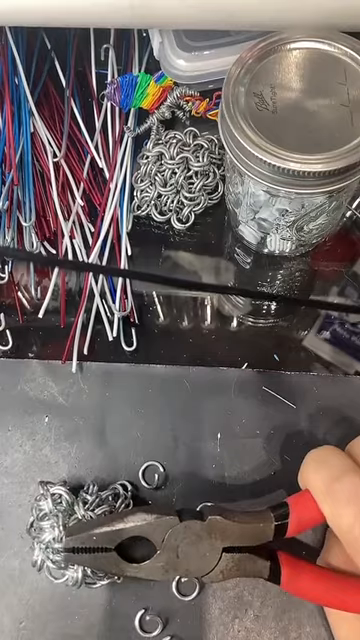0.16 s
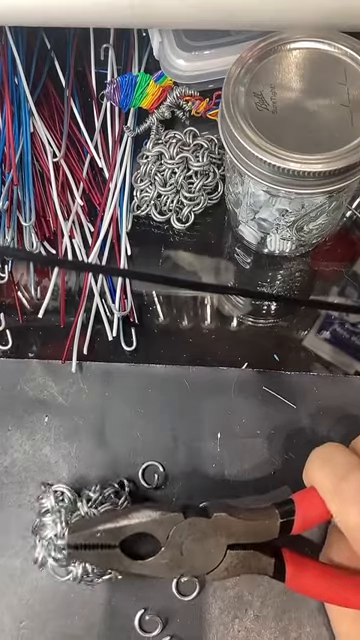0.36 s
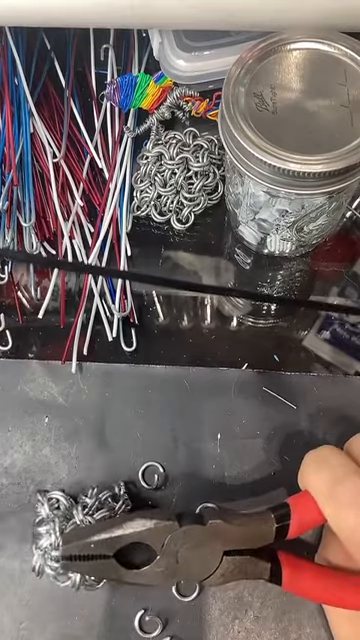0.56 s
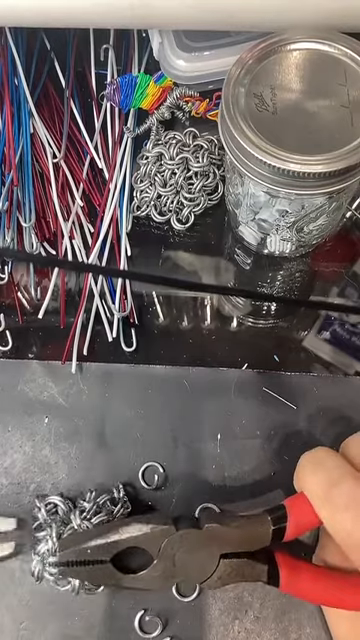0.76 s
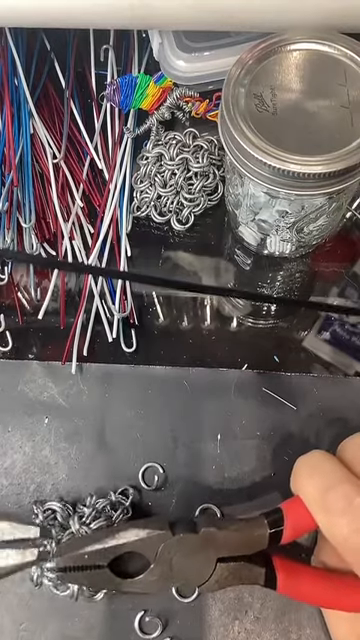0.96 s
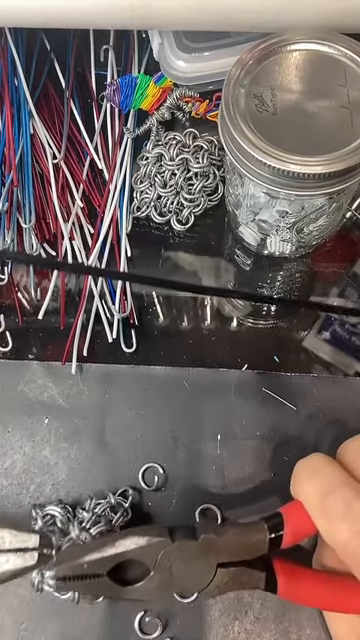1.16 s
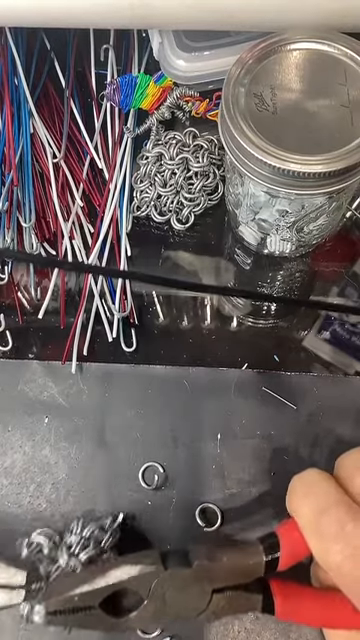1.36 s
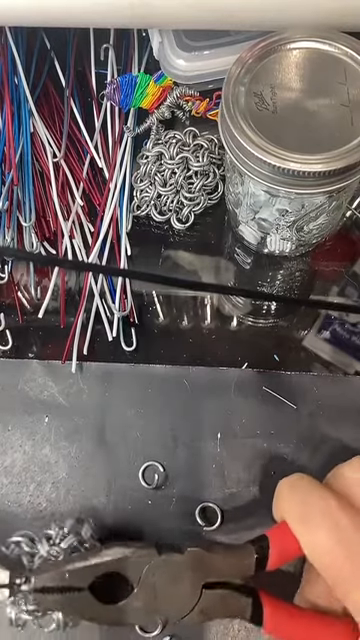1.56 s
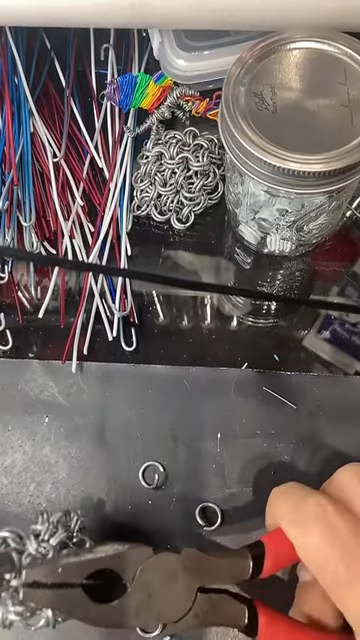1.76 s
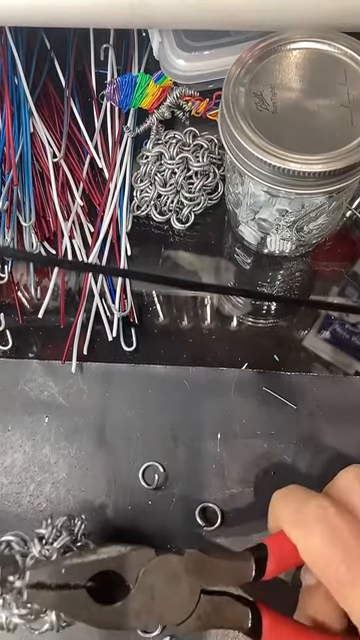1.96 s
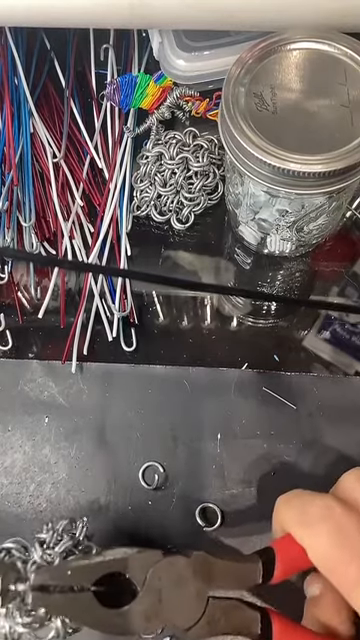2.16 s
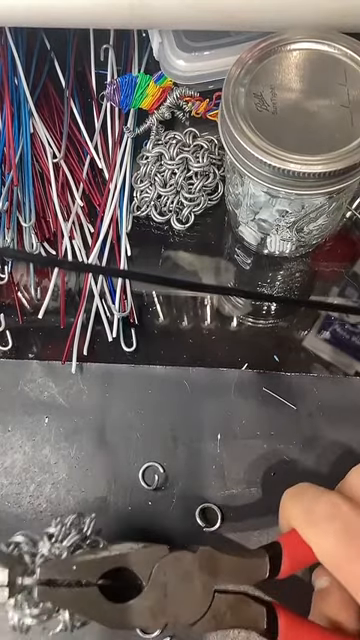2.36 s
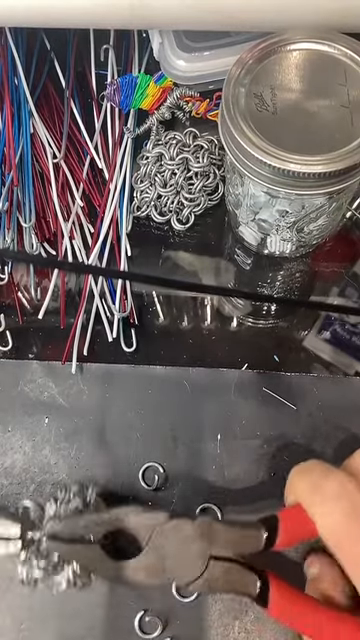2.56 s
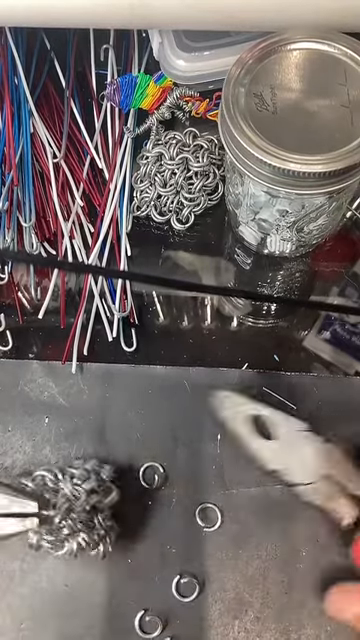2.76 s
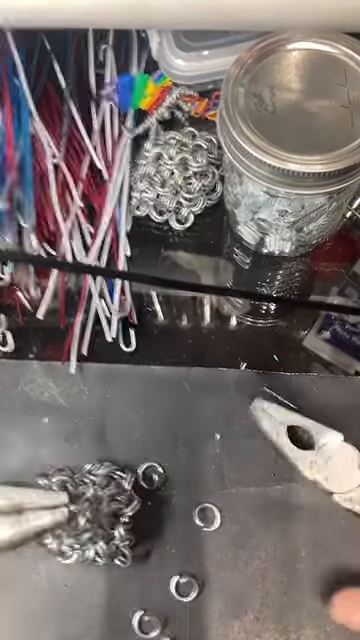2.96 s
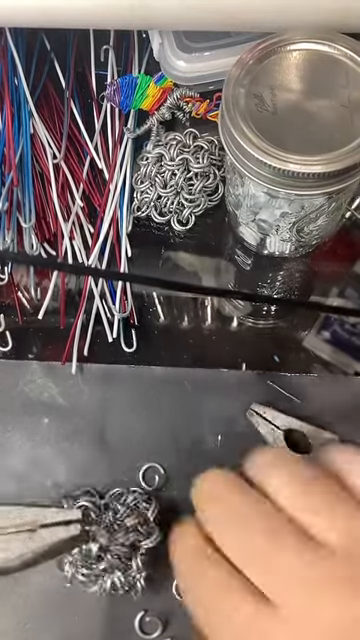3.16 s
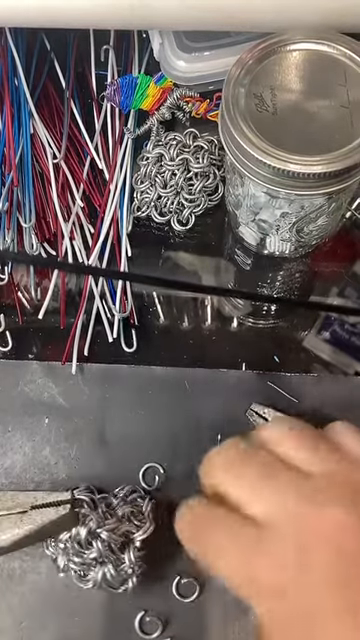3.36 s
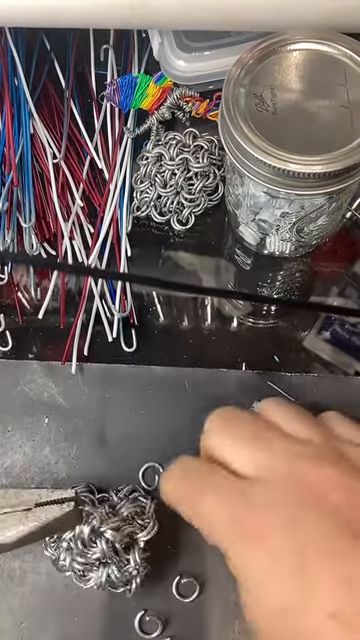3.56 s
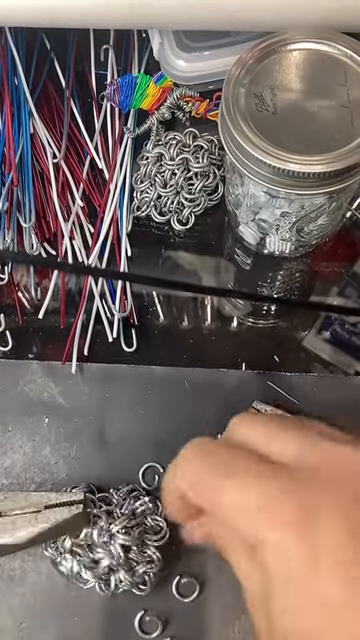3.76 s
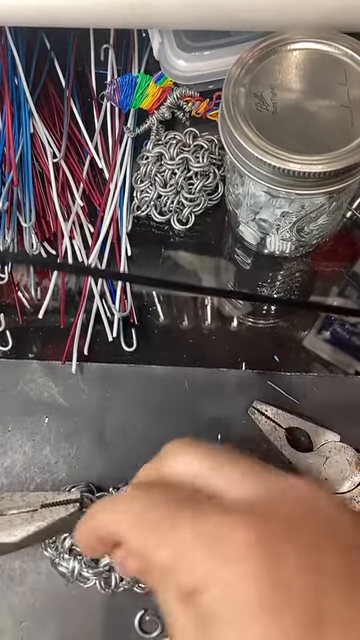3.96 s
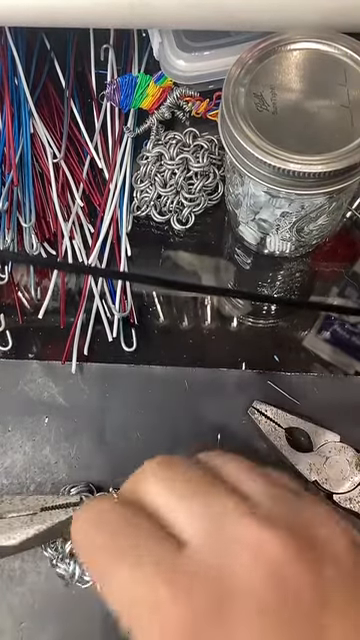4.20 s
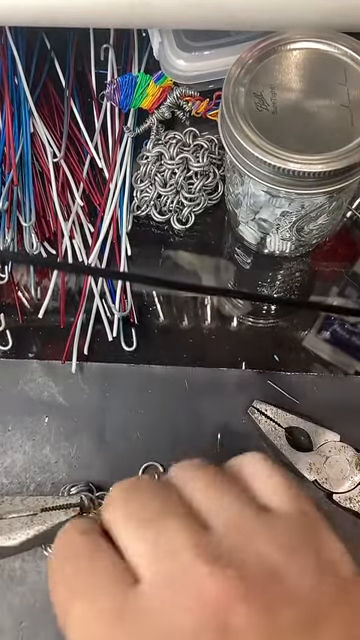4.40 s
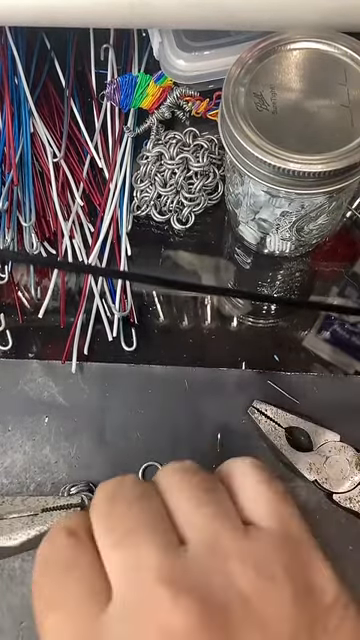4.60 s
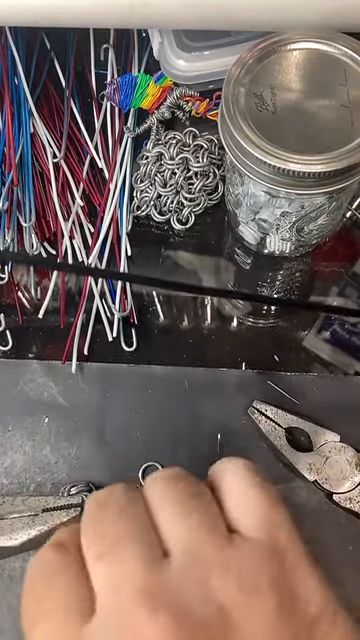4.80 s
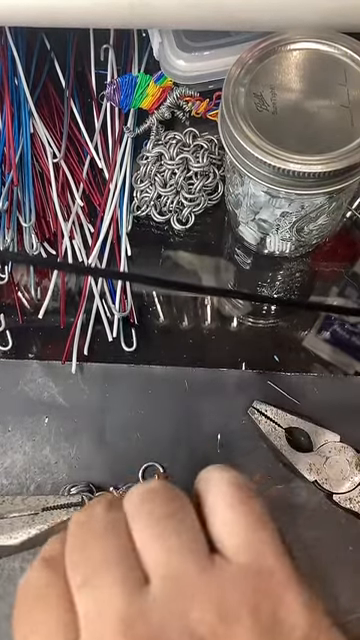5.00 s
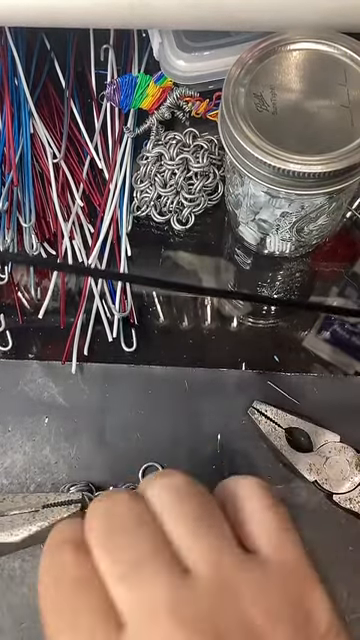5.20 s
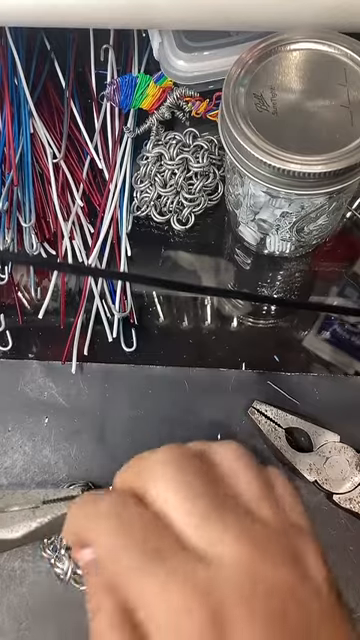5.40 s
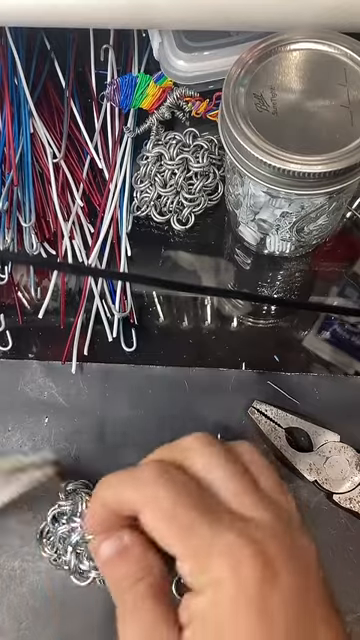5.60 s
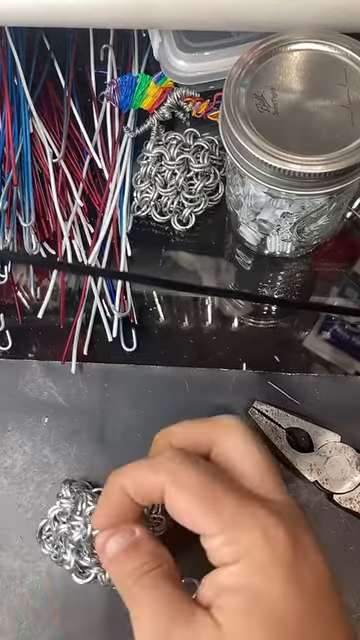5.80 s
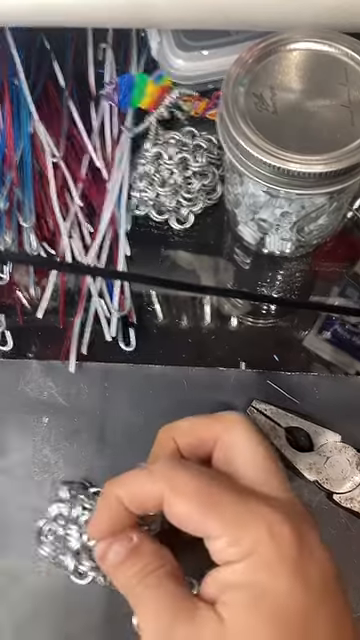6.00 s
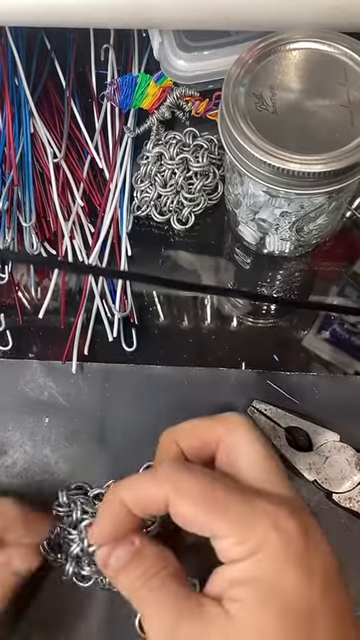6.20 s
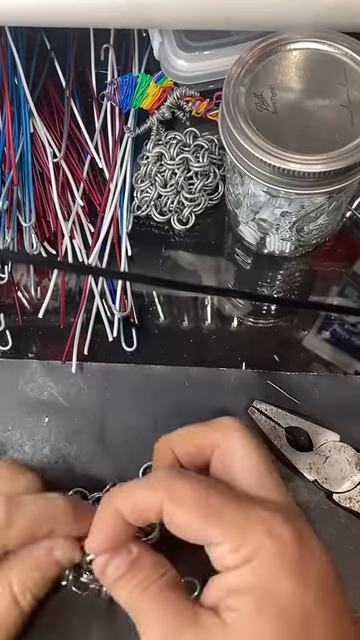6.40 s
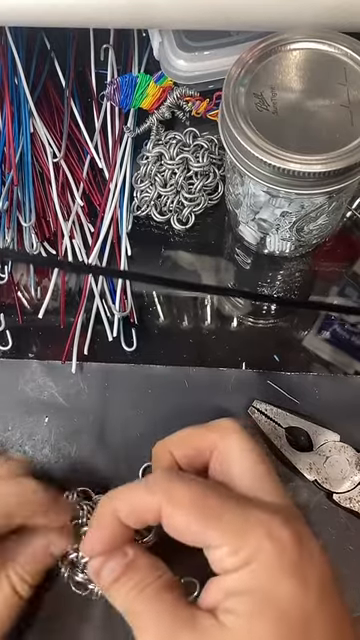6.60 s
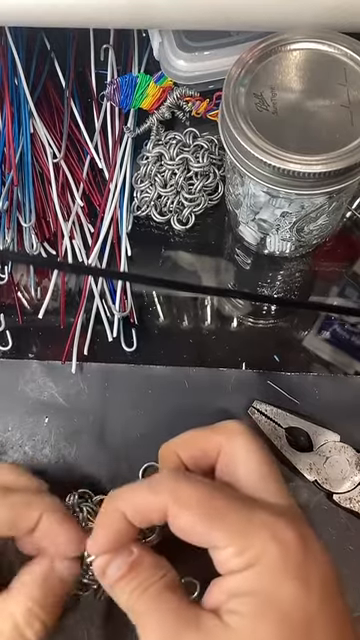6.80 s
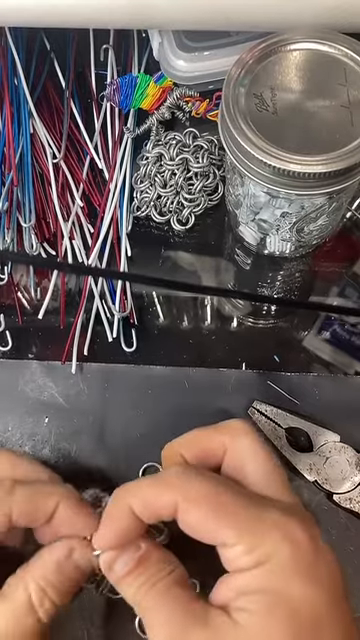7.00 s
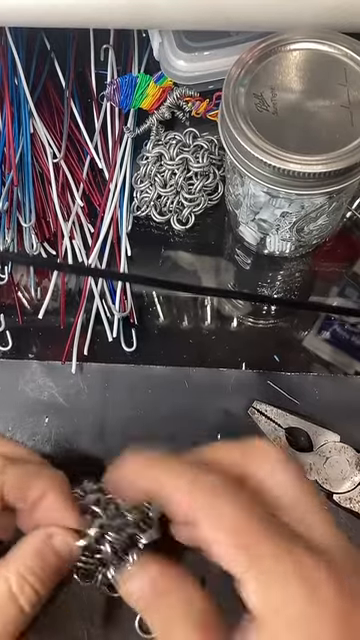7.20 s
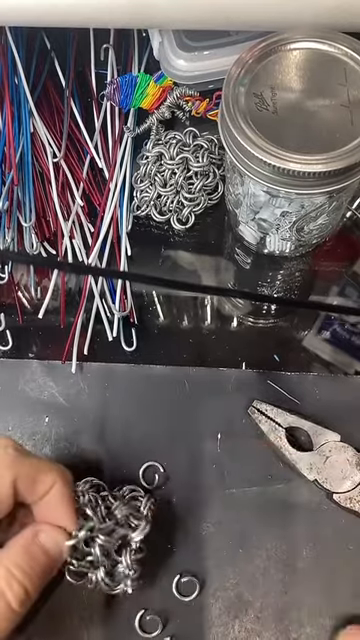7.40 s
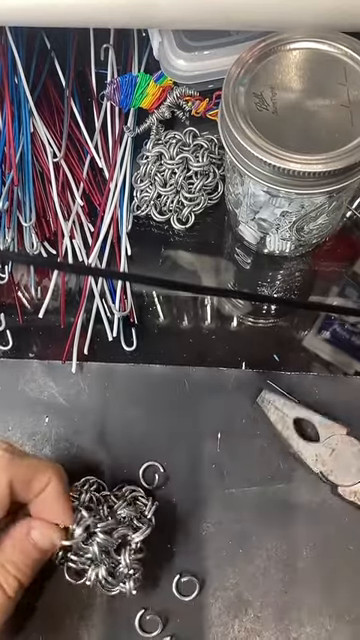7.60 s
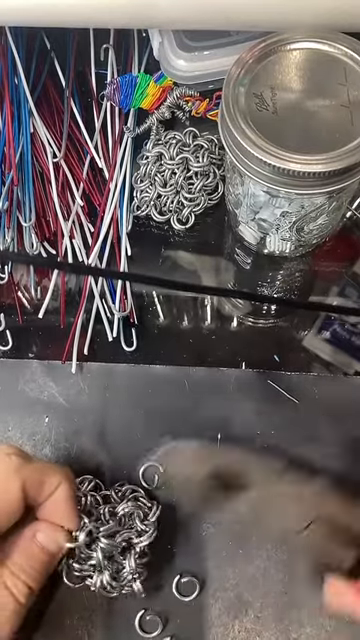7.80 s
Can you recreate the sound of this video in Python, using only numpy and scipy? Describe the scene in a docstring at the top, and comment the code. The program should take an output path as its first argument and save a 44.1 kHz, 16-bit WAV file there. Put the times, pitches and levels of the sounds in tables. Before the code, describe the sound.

Quiet, close jingling of linked metal rings, with steel pliers landing hard on the table, then two heavy thumps and more light rattling.

```python
"""Pliers and small metal rings on a table

Hands and steel pliers work a bunch of small linked metal rings on a work table in a quiet room.
The rings rustle, rattle and clink: short noises filtered to the colour of touching rings.
The pliers are put down hard: the table booms, thumps and knocks, and the steel rings on as dying sines.
A dull murmur (filtered noise), a faint mains hum (sines) and room noise lie under it all."""
import sys
import numpy as np
from scipy import signal
from scipy.fft import rfft, irfft, next_fast_len
from scipy.io import wavfile
from scipy.ndimage import uniform_filter1d

SR = 44100
rng = np.random.default_rng(int(sys.argv[2]) if len(sys.argv) > 2 else 0)


def pcm_store(signal):
    """Save signal as 16-bit PCM."""
    levels = np.round(np.clip(np.atleast_2d(signal), -1, 1) * 32767)
    wavfile.write(sys.argv[1], SR, levels.astype(np.int16).T)


N = 346178  # length in samples

# In all tables and settings, t60_s is the time to die away by 60 dB.
# Steady room noise, its colour: pitch_hz, level_db (per Hz, relative)
ROOM_COLOUR = [(12, -58.5), (20, -26), (49, -4), (90, -6), (124, -2.5), (146, -10), (305, -11), (572, -21),
               (673, -19.5), (11800, -37.5), (13500, -48.5)]
ROOM_DB = -59  # overall rms level
# Mains hum: pitch_hz, level_db (rms, before it wavers)
HUM_TONES = [(59.2, -63.5), (118.4, -62.5)]

# Colour of touching rings: pitch_hz, level_db (per Hz, relative)
RING_COLOUR = [(710, -49), (1200, -19.5), (1970, -15), (4090, -15), (5480, -13.5), (8050, -12.5),
               (10100, -21), (12400, -30), (13500, -27)]
# Sliding rings sound thinner than shaken ones: pitch_hz, level_db
SLIDING_COLOUR = [(1500, -6), (3600, -1), (4800, -2)]
# The bunch of rings is slowly dragged over the table: start_s, level_db, brightest_hz
DRAG_CURVE = [(0, -58, 6900), (.55, -61.5, 6030), (1.2, -69, 6450), (1.42, -52.5, 6400),
              (1.55, -47.5, 5930), (1.62, -49, 5520), (1.66, -52.5, 5600), (1.74, -51.5, 5443),
              (1.78, -55, 5600), (1.85, -49.5, 5404), (1.89, -66.5, 5800), (2.585, -71.5, 5630),
              (2.6, -48, 5550), (2.88, -49, 5545), (2.91, -57.5, 5566), (3.0, -52, 5713), (3.04, -56, 6000),
              (3.3, -54, 6670), (3.45, -60.5, 6700), (4.2, -69, 6300), (5.3, -70, 6724), (5.6, -61, 7000),
              (6.25, -54.5, 6520), (6.7, -63, 6790), (7.85, -56, 6084)]
# Dull, low murmur, loudest after the hard blows, probably the table dying away:
# start_s, level_db (before its lumps)
MURMUR_CURVE = [(1.25, -79), (1.45, -58), (1.9, -73.5), (2.5, -73), (2.84, -47.5), (2.91, -54), (3.07, -57),
                (3.11, -47), (3.3, -39), (3.45, -57), (4.35, -56.5), (4.6, -76), (6.1, -84.5), (6.3, -54.5),
                (7.3, -62), (7.85, -53)]
# Colour of that murmur: pitch_hz, level_db (per Hz, relative)
MURMUR_COLOUR = [(35, -6.5), (110, 15), (400, 4), (1300, -1.5), (1700, -4), (5000, -18)]
# Shakes of the bunch that swell and fade: top_s, level_db (about rms at the top), brightest_hz,
# swell_s (time of a tenfold swell)
SHAKES = [(0.023, -43.5, 7260, 0.045), (0.126, -35.5, 6600, 0.025), (.215, -40, 6800, 0.1),
          (0.262, -44, 2630, 0.062), (0.453, -40.5, 5820, 0.056), (0.996, -51.5, 6200, 0.048),
          (1.085, -58.5, 3160, 0.057), (1.426, -49.5, 2380, 0.038), (2.108, -57.5, 5640, 0.038),
          (2.805, -42.5, 5500, 0.07), (2.859, -40, 6700, 0.062), (2.99, -44, 6240, 0.072),
          (3.411, -54.5, 7100, 0.044), (3.729, -50, 8460, 0.072), (3.896, -51.5, 7680, 0.076),
          (5.67, -48.5, 7884, 0.13), (5.74, -60, 2740, 0.041), (5.98, -31.5, 6700, 0.034),
          (6.34, -42, 3100, 0.065), (6.645, -54.5, 8850, .1), (6.908, -58.5, 8530, 0.045),
          (7.064, -47.5, 7160, 0.038), (7.151, -50.5, 6570, 0.085), (7.345, -47, 3180, 0.069),
          (7.38, -36, 3300, 0.054), (7.594, -46, 6840, 0.085), (7.645, -40, 3830, 0.06),
          (7.765, -36, 6700, 0.02), (7.84, -51.5, 3520, 0.19)]

# Single clinks of ring on ring or ring on jaw: start_s, level_db (about the peak), brightest_hz
CLINKS = [(0.0943, -23, 4200), (0.1035, -17.5, 7540), (0.1162, -19, 8300), (0.184, -21, 7600),
          (0.1935, -20.5, 6800), (0.1994, -30, 6940), (0.938, -39.5, 6040), (0.9525, -37.5, 5970),
          (1.069, -38.5, 6360), (1.0964, -44, 3300), (1.2042, -40, 7860), (1.2253, -43.5, 3320),
          (1.4683, -31.5, 6400), (1.617, -36, 5400), (1.632, -47, 5500), (1.6484, -35, 5580),
          (1.6755, -34, 5400), (1.701, -40, 7700), (1.802, -40, 7700), (1.848, -39, 5430),
          (1.859, -35, 7350), (1.9148, -32.5, 5600), (2.4296, -29, 2090), (2.4448, -36.5, 2050),
          (2.5905, -25.5, 5800), (2.594, -26, 5700), (2.605, -32, 5600), (2.618, -38, 5500),
          (2.625, -45, 5600), (2.642, -25, 5100), (2.649, -34, 5500), (2.6995, -18.5, 5300),
          (2.7035, -27, 5700), (2.7084, -19, 5380), (2.7949, -32, 5600), (2.8305, -9.5, 7730),
          (2.9324, -28.5, 7900), (2.9685, -31, 5500), (2.9815, -28, 4640), (3.0915, -4.5, 8740),
          (3.099, -0.5, 2490), (3.1241, -14, 2300), (3.402, -40, 2350), (3.474, -36.5, 6900),
          (3.568, -36.5, 6500), (3.7328, -26.5, 6660), (4.1724, -46, 5800), (4.434, -47, 6500),
          (4.5263, -35.5, 7000), (4.98, -49, 7970), (5.9166, -9, 4450), (5.9652, -8.5, 6950),
          (5.973, -13, 6900), (6.127, -4.5, 8430), (6.1298, -3.5, 2680), (6.333, -29, 3300),
          (6.3441, -25, 3320), (6.5288, -35, 8700), (6.9087, -40, 8700), (7.0435, -34.5, 7240),
          (7.153, -32, 5800), (7.3884, -19.5, 4900), (7.5228, -19.5, 4400), (7.538, -43, 6350),
          (7.6179, -11.5, 4300), (7.7175, -32.5, 2050), (7.7848, -31.5, 6700)]

# Blows on the table: start_s, boom_db, thump_db, thump_hz, knock_db
BLOWS = [(0.11, -35, -33.5, 258, -39), (0.283, -36.5, -27, 247, -44.5), (1.422, -60, -45.5, 397, -41.5),
         (1.875, -52, -60, 248, -53), (2.43, -68, -69, 600, -46.5), (3.026, -42.5, -36.5, 396, -48.5),
         (3.087, -16.5, -14, 679, -1.5), (3.6, -44, -54, 300, -58), (4.09, -54, -50.5, 320, -58),
         (4.33, -48, -46.5, 384, -53), (5.914, -18.5, -7, 390, -11.5), (6.113, -32, -28, 330, -41),
         (6.127, -17.5, -9.5, 320, -18.5), (6.337, -51, -43, 600, -38), (7.388, -51, -34.5, 486, -34),
         (7.523, -69, -46, 400, -41.5), (7.643, -38.5, -37.5, 354, -40.5), (7.752, -38.5, -36.5, 263, -50),
         (7.809, -50, -43, 370, -43.5)]
# Low boom of the table top: pitch_hz, level_db (relative), t60_s (for the heaviest blow)
BOOM_MODES = [(62.7, -13.5, 0.47), (85, -6, 0.25), (110.56, -3, 0.44), (181.7, -4.5, .35),
              (224.1, -8.5, 0.31), (261, -10, 0.19), (337, -11, 0.24)]
# Colour of the dense knock: pitch_hz, level_db (per Hz, relative)
KNOCK_COLOUR = [(150, -31.5), (250, -0.5), (424, -4.5), (631, -2.5), (708, -5), (1050, -6), (4820, -21.5),
                (13000, -44)]
# How long the dense knock lasts: pitch_hz, t60_s (for the heaviest blow)
KNOCK_T60 = [(300, 0.29), (1500, 0.33), (5000, 0.38), (12000, 0.11)]
# Clearer tones in the knock: pitch_hz, level_db (relative), t60_s (for the heaviest blow)
KNOCK_MODES = [(794, 4, 0.16), (1087, -0.5, .25), (1356, -7.5, .2), (1575, 0, 0.15), (1660, 0, .22),
               (2062, -5.5, 0.18), (2287, -4.5, 0.12), (2680, -4.5, 0.16), (3150, -8, 0.18),
               (4700, -9.5, .05)]

# Pliers land on the table: start_s, ring_db (table top), rattle_db (rings), brightest_hz
PUT_DOWN = [(3.09, -23, -18, 4750), (5.918, -26, -31, 4570), (6.13, -34, -22.5, 4850)]
# Long, faint ring of the metal table top: pitch_hz, level_db (relative), t60_s
STEEL_MODES = [(258, -29, 2), (323, -22, 2.2), (366, -28, 2.5), (452, -30, 2), (748, -32, 1.8),
               (942, -29, 2.5)]
# Ring of the pliers, some modes in close beating pairs: pitch_hz, level_db (relative), t60_s
PLIERS_MODES = [(649, 3.5, .65), (1227, -30, 2.2), (1346, -31, 1.8), (1782, -32, 1.8), (2080, -35, 1.6),
                (2089, -34, 2.2), (3540, -21, .6), (3590, -22, .6), (3750, -32, 1.5), (3790, -32, 1.4)]

# Stereo width, the side signal under the middle: pitch_hz, level_db
WIDTH = [(3700, -90), (4400, -15), (8000, -15), (13000, -18)]
EDGE_HZ = 13150  # almost nothing is left above this pitch

# Rings: another takes over this often, at a slightly other pitch (spread as a share of the pitch)
RING_TURN_S, RING_SPREAD = .0035, .065
MURMUR_LUMPS_DB = 2.6  # the murmur comes in lumps of a few tens of ms
FADE_PER_SWELL = .7  # a shake stops sooner than it swells

# Clinks: the neighbouring rings settle almost at once
SETTLE_T60_S = .01
# A clink thins out below these shares of its brightest pitch, and far above it
THIN_DB, THIN_FROM, THIN_TO = -5, 0.4, 0.57
# Faint clinks under the fingers, at random
FAINT_PER_S, FAINT_DB, FAINT_SPREAD_DB = 10, -56, 2
FAINT_LOW_HZ, FAINT_HIGH_HZ = 4980, 9560

# Blows: a lighter one dies sooner, losing this share of its ring time per dB of boom under the heaviest
SHORTER_PER_DB, HEAVIEST_DB = .006, -16.5
# The bending wave brings the treble first: the thump drops at once to this share of its pitch
THUMP_FALL_S, THUMP_END, THUMP_T60_S = .005, .22, .06
BASS_LATE_S = .015  # the low modes come together this long after the blow
MODE_GAP_HZ, MODE_DB = 40, 14  # the knock holds many thin modes at chance pitches

# Landing: the jolted rings rattle out; the faint ring of the top wavers, mode by mode
RATTLE_T60_S, WAVER_DB = 0.26, 4
# The first pair of pliers lands free of the hand and rings
PLIERS_S, PLIERS_DB = 3.092, -23


def gain_of(db):
    """Turns decibels into a plain multiplier."""
    return 10 ** (np.asarray(db) / 20)


def evened(x):
    """Scales a sound to an rms level of 1."""
    return x / np.sqrt(np.mean(x ** 2) + 1e-20)


def smoothed(x, size):
    """Averages neighbours in time twice, so only slow changes stay."""
    return uniform_filter1d(uniform_filter1d(x, size), size)


def read(points, hz):
    """Reads a table of pitches and values at any pitch, on a logarithmic pitch scale."""
    f, value = np.transpose(points)
    return np.interp(np.log(hz + 1), np.log(f + 1), value)


def follow(rows, column):
    """Draws one column of a table as a curve along the whole time."""
    return np.interp(np.arange(N) / SR, *np.transpose(rows)[[0, column]])


def add(mix, s, sound):
    """Adds a sound into the mix at a time in seconds."""
    part = mix[round(s * SR):][:len(sound)]
    part += sound[:len(part)]


def coloured(x, points):
    """Filters a sound by a spectrum in dB."""
    size = next_fast_len(len(x))
    gains = gain_of(read(points, np.fft.rfftfreq(size, 1 / SR)))
    return irfft(rfft(x, size) * gains, size)[:len(x)]


def resonate(x, hz, width):
    """Shifts the curve hz down to zero, smooths, and shifts back: a resonance of gain 1."""
    turn = np.exp(2j * np.pi * np.cumsum(hz * np.ones(len(x))) / SR)
    r = np.exp(-np.pi * width / SR)
    smooth = signal.lfilter([1 - r], [1, -r], x / turn + 1e-18)
    return 2 * (turn * smooth).real


def ringing(modes, t, spread_db, length=1):
    """Adds up dying sines; where the blow lands changes the share of each mode."""
    shares = gain_of(spread_db * rng.standard_normal(len(modes)))
    total = 0
    for share, (hz, db, t60) in zip(shares, modes):
        fade = gain_of(db - 60 * t / (t60 * length))
        total = total + share * fade * np.sin(2 * np.pi * hz * t)
    return total


def contacts(size):
    """About a thousand tiny contacts a second, a few strong, each a puff of about a millisecond."""
    strength = gain_of(2.8 * np.minimum(rng.exponential(1, size), 4))
    hits = strength * (rng.random(size) < 1000 / SR)
    puffs = signal.lfilter([1], [1, -np.exp(-1 / (0.001 * SR))], hits)
    return evened((2.0 + puffs) * rng.standard_normal(size))


def jingle(x, hz, focus=1):
    """The broad colour of touching rings, one strong ring mode and a weaker one above it."""
    # no two rings ring quite alike; the first keeps the given pitch
    turns = np.arange(len(x)) // round(RING_TURN_S * SR)
    detune = RING_SPREAD * rng.standard_normal(turns[-1] + 1)[turns] * (turns > 0)
    hz = hz * (1 + detune)
    modes = evened(resonate(x, hz, 240)) + 0.42 * evened(resonate(x, 1.38 * hz, 240))
    return evened(0.98 * evened(coloured(x, RING_COLOUR)) + 0.64 * focus * modes)


def room():
    """Steady room noise with a slightly wavering mains hum."""
    t = np.arange(N) / SR
    waver_db = 2.0 * evened(smoothed(rng.standard_normal(N), 4000))
    hum = sum(np.sqrt(2) * gain_of(db + waver_db) * np.sin(2 * np.pi * hz * t) for hz, db in HUM_TONES)
    noise = evened(coloured(rng.standard_normal(N), ROOM_COLOUR))
    return hum + gain_of(ROOM_DB) * noise


def drag():
    """Rings rustle as they slide, ringing more when louder; a dull, lumpy murmur lies under them."""
    rustle_db = follow(DRAG_CURVE, 1)
    focus = 1.9 * np.clip((rustle_db + 65.0) / 16, 0, 1)
    rings = coloured(jingle(contacts(N), follow(DRAG_CURVE, 2), focus), SLIDING_COLOUR)
    lumps = evened(smoothed(rng.standard_normal(N), 1500))
    murmur_db = follow(MURMUR_CURVE, 1) + MURMUR_LUMPS_DB * lumps
    murmur = gain_of(murmur_db) * evened(coloured(rng.standard_normal(N), MURMUR_COLOUR))
    return gain_of(rustle_db) * rings + murmur


def shake(s, db, hz, swell):
    """A burst of contacts with a rounded top; low-pitched ones ring more. Gives start and sound."""
    t = np.arange(max(-s, -.25), .3, 1 / SR)  # zero at the top
    slope = t / max(swell, .003) / np.where(t < 0, 1, FADE_PER_SWELL)
    level_db = db - 20 * (np.sqrt(slope ** 2 + 0.38 ** 2) - 0.4)
    return s + t[0], gain_of(level_db) * jingle(contacts(len(t)), hz, (4500 / hz) ** 0.88)


def faint_clinks():
    """Small clinks scattered at random, as rows of start_s, level_db, brightest_hz."""
    when, size, pitch = rng.random((round(FAINT_PER_S * N / SR), 3)).T
    level_db = FAINT_DB - FAINT_SPREAD_DB * np.log(size + .05)
    return zip(when * N / SR, level_db, FAINT_LOW_HZ + (FAINT_HIGH_HZ - FAINT_LOW_HZ) * pitch)


def clink(db, hz):
    """A sharp tick with a few quick rebounds, then the neighbouring rings settle."""
    t = np.arange(round(.2 * SR)) / SR
    focus = 1.1 * (5500 / hz) ** 0.55
    noise = rng.standard_normal(len(t))
    rebounds_s = np.cumsum(rng.uniform(0.0024, 0.0053, 3))
    first = np.exp(-t / 0.0016) * np.minimum(t / 0.00039, 1)
    shape = first + sum(gain_of(-7.0 * (k + 1)) * np.roll(first, round(s * SR))
                        for k, s in enumerate(rebounds_s))
    # the tick's highest treble, above about 11.5 kHz, is eased down by a decibel
    tick = coloured(jingle(noise * shape, hz, focus), [(9000, 3.5), (11500, 2.5)])
    settle_fade = gain_of(-13.5 - 60 * t / SETTLE_T60_S) * np.minimum(t / 0.0042, 1)
    settle = settle_fade * jingle(noise, hz, focus)
    thinning = [(THIN_FROM * hz, THIN_DB), (THIN_TO * hz, 0), (2.1 * hz, 0), (2.9 * hz, THIN_DB)]
    return gain_of(db) * coloured(tick / abs(tick).max() + settle, thinning)


def table_knock(t, rise, length):
    """The dense high modes of the table: noise with strong thin lines, each pitch dying at its own pace."""
    lines = rfft(rng.standard_normal(len(t)))
    is_mode = rng.random(len(lines)) < len(t) / SR / MODE_GAP_HZ / 2
    lines = lines * (1 + gain_of(MODE_DB) * is_mode)
    hz, frames, z = signal.stft(coloured(irfft(lines, len(t)), KNOCK_COLOUR), SR, nperseg=256)
    fade = gain_of(-60 * frames / (length * read(KNOCK_T60, hz)[:, None]))
    dense = signal.istft(z * fade, SR, nperseg=256)[1][:len(t)]
    dense = dense * rise * (1 + 1.6 * np.exp(-t / 0.044))  # the contact itself is louder than the tail
    return dense / abs(dense).max() + 0.12 * rise * ringing(KNOCK_MODES, t, 3.8, length)


def table_thump(t, rise, hz):
    """The table where it is hit: a sine that falls fast in pitch, and four short modes."""
    falling_hz = hz * (THUMP_END + (1.5 - THUMP_END) * np.exp(-t / THUMP_FALL_S))
    fall = 1.2 * gain_of(-60 * t / THUMP_T60_S) * np.sin(2 * np.pi * np.cumsum(falling_hz) / SR)
    modes = [(0.64 * hz, -5, .07), (hz, -3, .05), (1.4 * hz, -6, .045), (2.2 * hz, -5, .045)]
    return (fall + ringing(modes, t, 1.5)) * rise


def blow(boom_db, thump_db, thump_hz, knock_db):
    """The table top booms in its low modes, thumps where it is hit and knocks in its dense high modes."""
    t = np.arange(round(.8 * SR)) / SR
    length = max(1 - SHORTER_PER_DB * (HEAVIEST_DB - boom_db), .1)
    rise = 1 - np.exp(-(t / 0.0031) ** 2)
    knock = table_knock(t, rise, length)
    thump = table_thump(t, rise, thump_hz)
    late_rise = 1 - np.exp(-(t / BASS_LATE_S) ** 4)
    boom = ringing(BOOM_MODES, t - BASS_LATE_S, 1.4, length) * late_rise
    return gain_of(boom_db) * boom + gain_of(thump_db) * thump + gain_of(knock_db) * knock


def put_down(ring_db, rattle_db, hz):
    """The metal top rings on faintly while the jolted rings rattle out."""
    t = np.arange(2 * SR) / SR
    rattle_fade = gain_of(rattle_db - 60 * t / RATTLE_T60_S) * np.minimum(t / 0.0079, 1)
    rattle = rattle_fade * jingle(contacts(len(t)), hz)
    # averaged along time only, so each mode wavers slowly on its own
    wavers = smoothed(rng.standard_normal((len(STEEL_MODES), len(t))), 2500)
    ring = 0
    for waver, mode in zip(wavers, STEEL_MODES):
        ring = ring + gain_of(WAVER_DB * evened(waver)) * ringing([mode], t, 1.7)
    return gain_of(ring_db) * ring + rattle


def pliers_ring():
    """The steel pliers ring freely in their own modes, as dying sines."""
    t = np.arange(2 * SR) / SR
    return gain_of(PLIERS_DB) * ringing(PLIERS_MODES, t, 0.87)


def scene():
    """Lays every sound into one mix, the same on both sides."""
    mid = room() + drag()
    for row in SHAKES:
        add(mid, *shake(*row))
    for s, *row in [*CLINKS, *faint_clinks()]:
        add(mid, s, clink(*row))
    for s, *row in BLOWS:
        add(mid, s, blow(*row))
    for s, *row in PUT_DOWN:
        add(mid, s, put_down(*row))
    add(mid, PLIERS_S, pliers_ring())
    return np.array([mid, mid])


def record(dry):
    """Softly rounds off loud peaks, lets the treble flicker left and right, and cuts the highest pitches."""
    mid = np.tanh(dry[0] / .92) * .92
    flicker = evened(smoothed(rng.standard_normal(N), 60))
    side = coloured(mid * flicker, WIDTH)
    edge = signal.firwin(511, EDGE_HZ, window=("kaiser", 9), fs=SR)
    return signal.oaconvolve(np.array([mid + side, mid - side]), edge[None], "same")


dry = scene()
out = record(dry)
pcm_store(out)
```